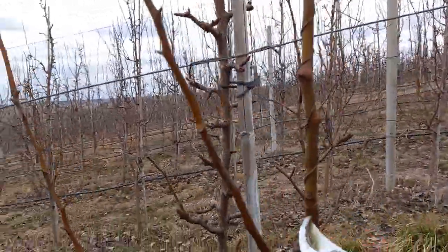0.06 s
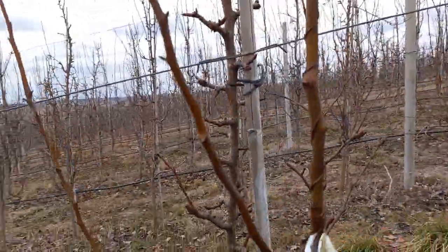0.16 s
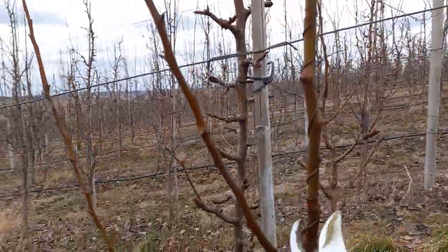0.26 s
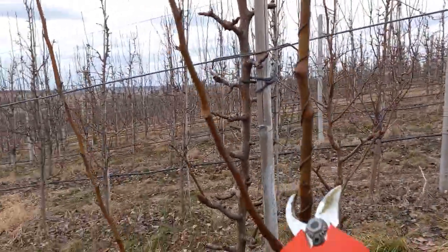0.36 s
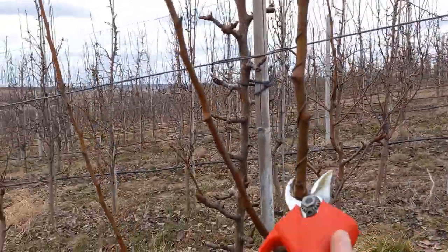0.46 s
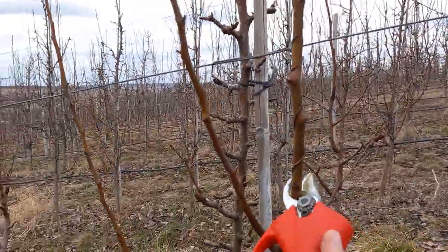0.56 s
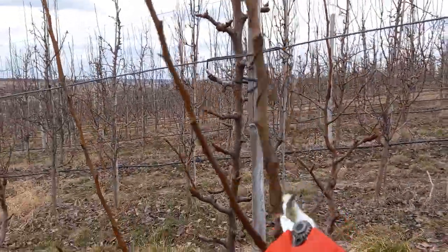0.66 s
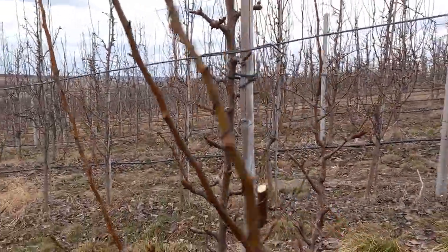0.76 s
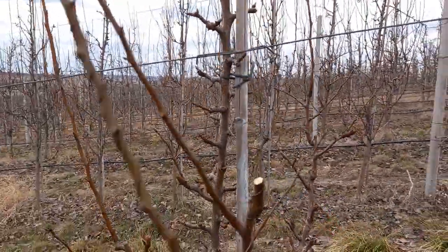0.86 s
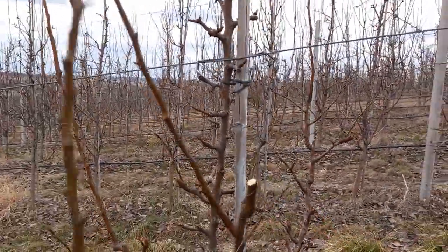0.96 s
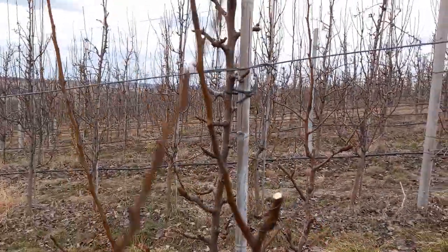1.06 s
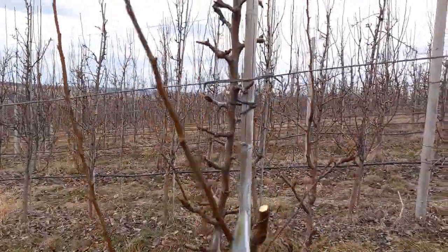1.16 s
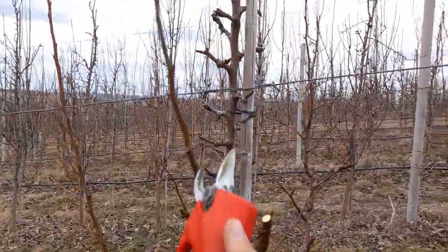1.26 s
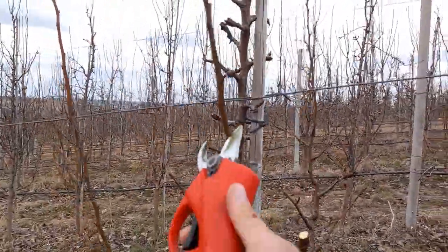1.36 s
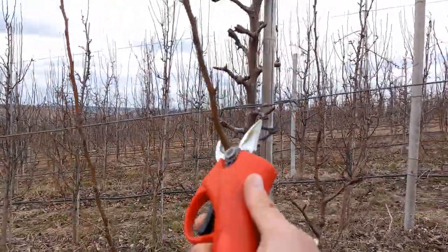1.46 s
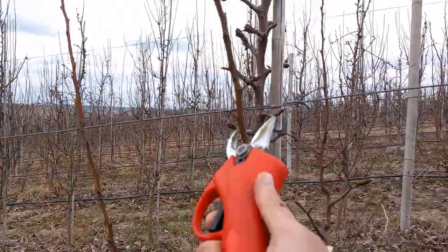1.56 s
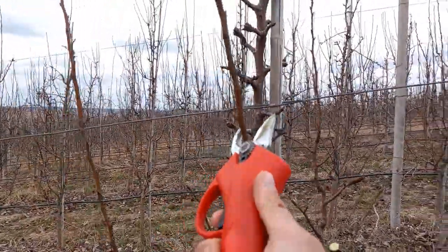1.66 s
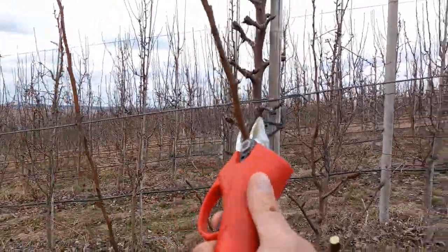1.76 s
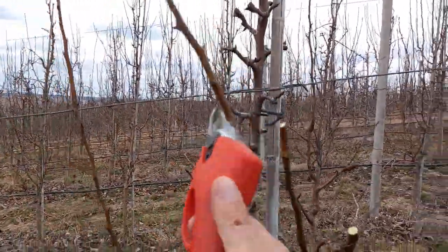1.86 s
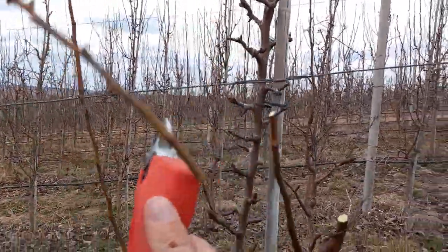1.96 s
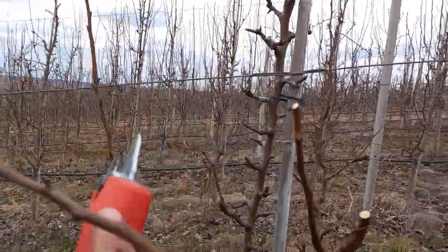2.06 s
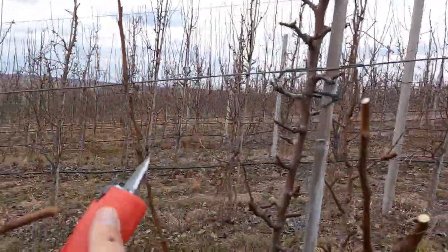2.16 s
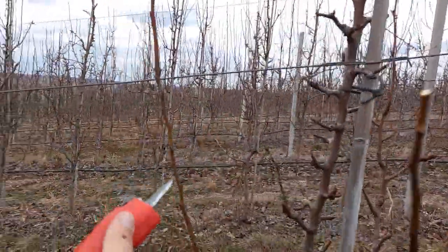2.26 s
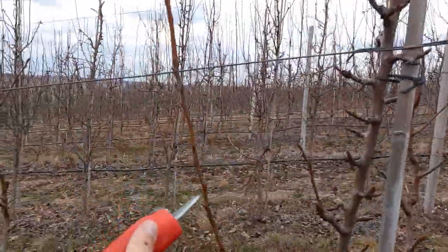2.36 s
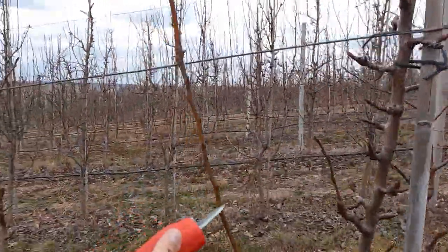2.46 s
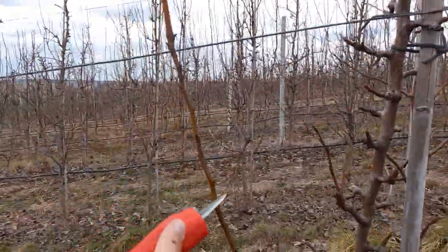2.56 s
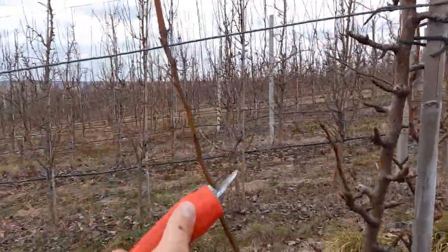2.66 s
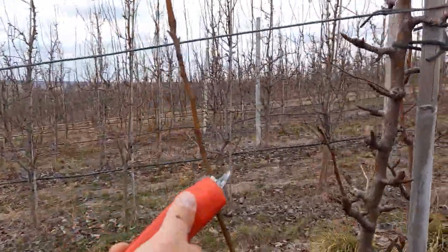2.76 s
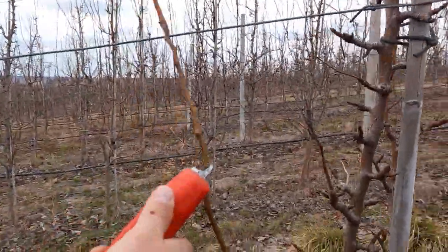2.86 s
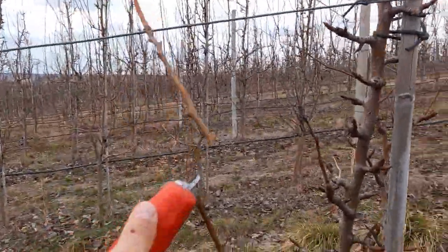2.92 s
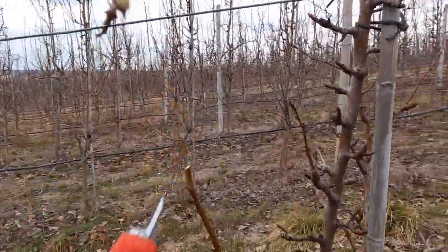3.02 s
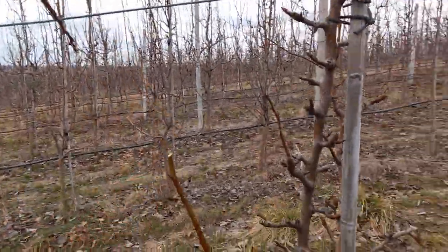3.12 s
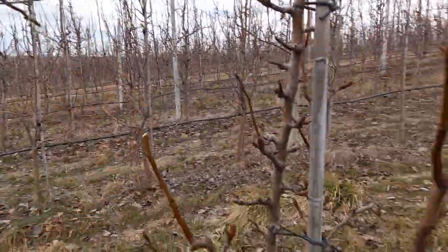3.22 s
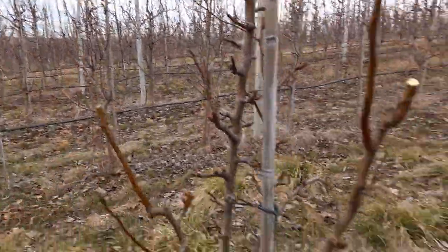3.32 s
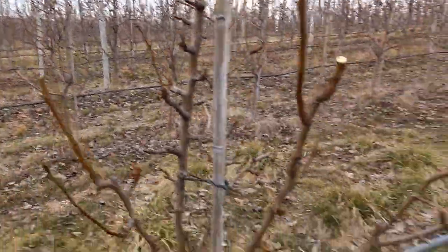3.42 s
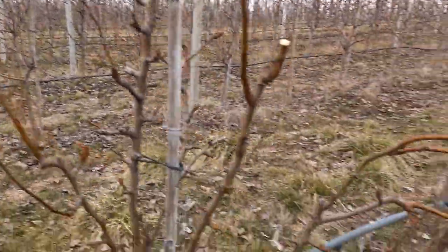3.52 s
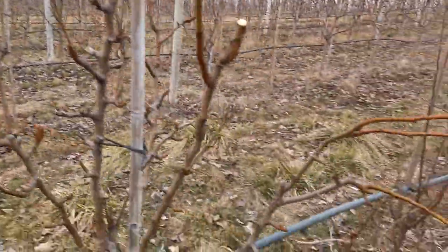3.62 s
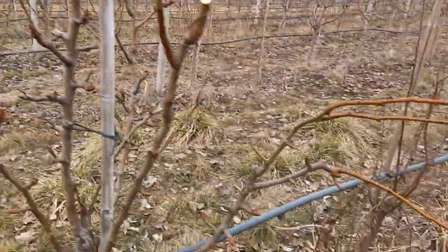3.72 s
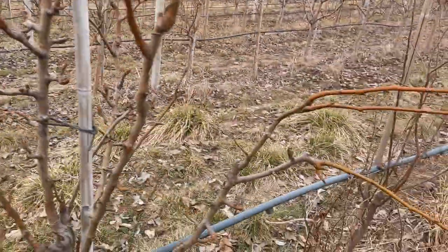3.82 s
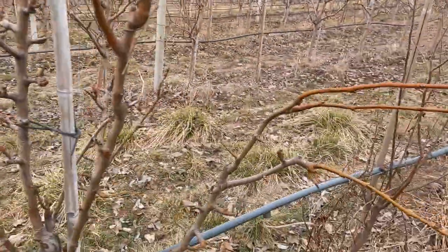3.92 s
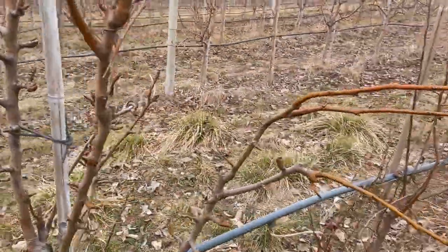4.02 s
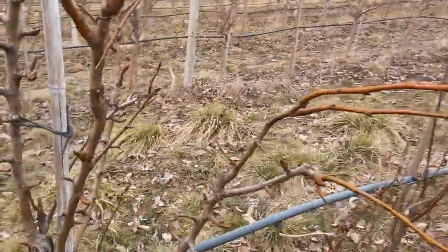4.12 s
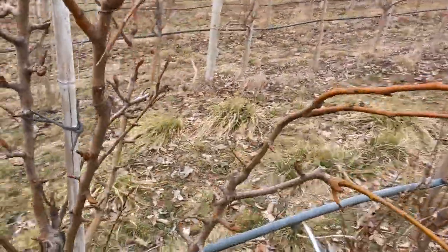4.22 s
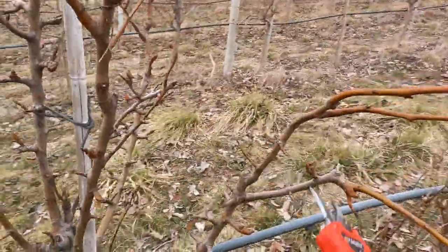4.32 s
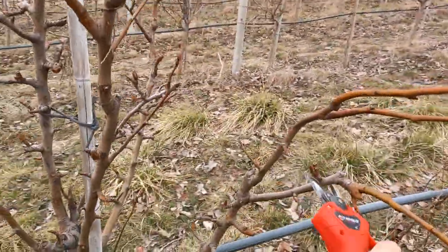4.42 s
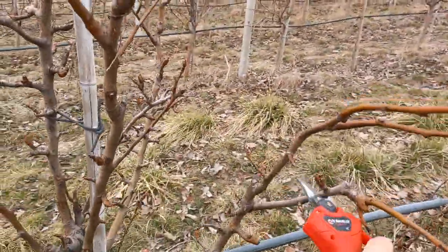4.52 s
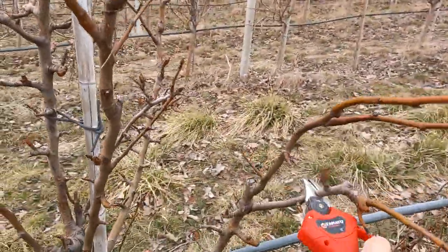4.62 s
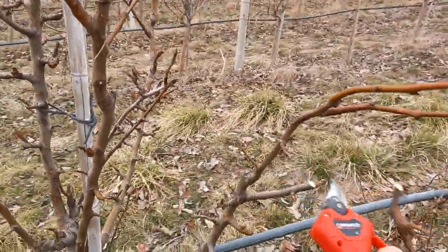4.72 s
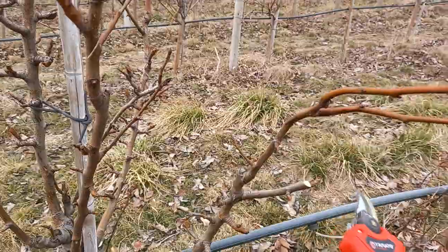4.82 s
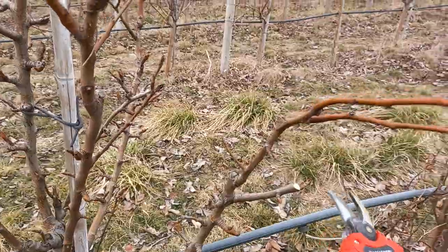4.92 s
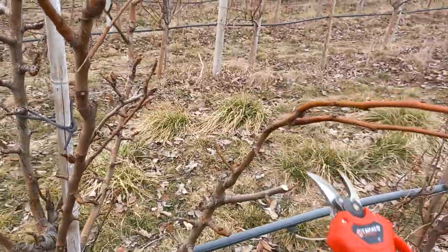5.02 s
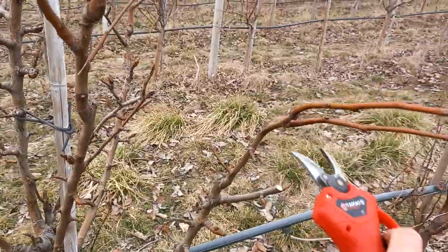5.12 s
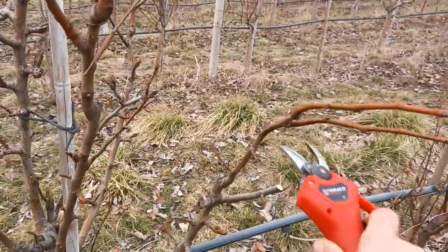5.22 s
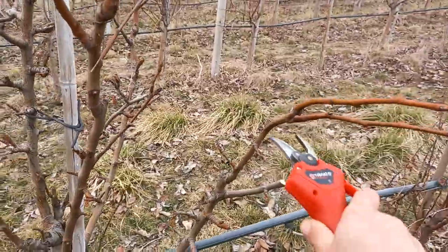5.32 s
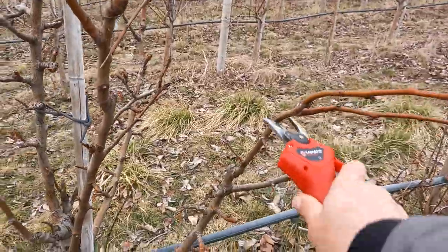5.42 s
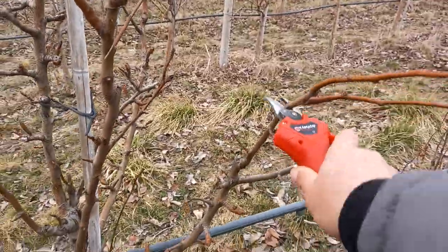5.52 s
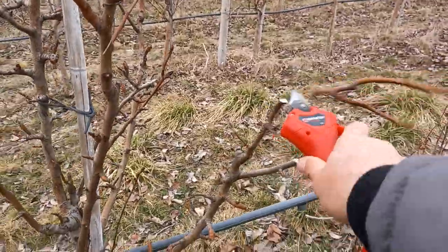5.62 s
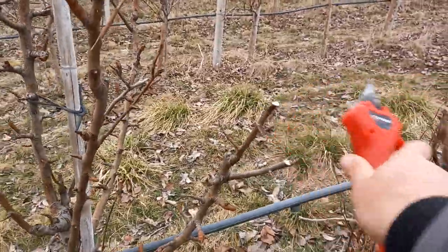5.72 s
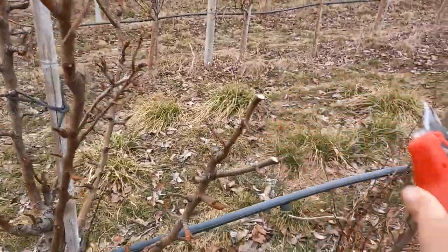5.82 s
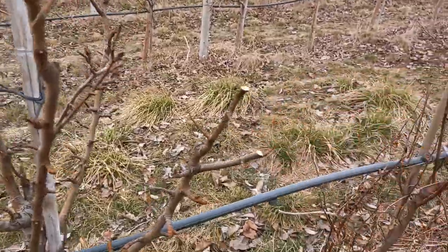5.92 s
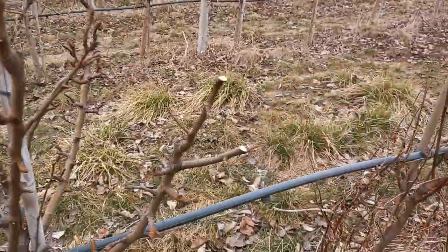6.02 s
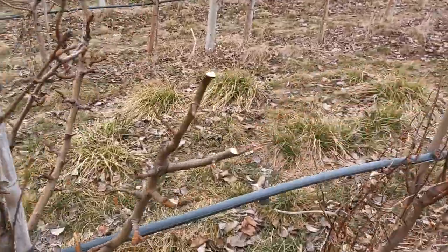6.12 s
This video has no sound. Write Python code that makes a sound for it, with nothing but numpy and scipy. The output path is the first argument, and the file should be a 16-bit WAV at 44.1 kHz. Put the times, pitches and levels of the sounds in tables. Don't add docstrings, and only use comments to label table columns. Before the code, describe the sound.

Close outdoor recording of powered pruning shears in a bare orchard. Each quarter-second stroke begins with a tiny high chirp, then a rattling geared motor whirrs up and slows to a blade knock. Some strokes crush wood and end in a sharp snap. Twigs tick and sleeves rustle between cuts, while wind rumbles low on the stereo microphone, strongest at the start and midway.

```python
import sys
import numpy as np
from scipy import signal
from scipy.io import wavfile
from scipy.ndimage import uniform_filter1d, map_coordinates

SR = 44100
rng = np.random.default_rng(int(sys.argv[2]) if len(sys.argv) > 2 else 0)


def elevation(decibels):
    levels = np.asarray(decibels, float)
    return 10 ** (levels / 20)


def wav_record(signal):
    frames = np.transpose(np.atleast_2d(signal))
    bounded = np.clip(frames, -1, 1)
    quanta = np.round(bounded * 32767).astype(np.int16)
    wavfile.write(sys.argv[1], SR, quanta)


N = 272538


def evened(x):
    return x / np.sqrt(np.mean(x ** 2) + 1e-20)


def add(mix, start_s, sound):
    part = mix[round(start_s * SR):][:len(sound)]
    part += sound[:len(part)]


def colour(x, points):
    hz, db = np.transpose(points)
    bin_hz = abs(np.fft.fftfreq(8192, 1 / SR))
    log_gain = np.interp(np.log(bin_hz + 1), np.log(hz), db) * np.log(10) / 20
    minimum_phase = np.exp(np.conj(signal.hilbert(log_gain)))
    taps = np.fft.ifft(minimum_phase).real[:4096]
    return signal.oaconvolve(x, taps)[:len(x)]


def ring(x, pitch_hz, width_hz):
    return signal.lfilter(*signal.iirpeak(pitch_hz, pitch_hz / width_hz, SR), x)


def wobble(count, size):
    smooth = uniform_filter1d(rng.standard_normal(count), size=size)
    return evened(uniform_filter1d(smooth, size=size))


def grains(per_s, spread_db, hiss):
    size_db = spread_db * np.minimum(rng.exponential(1, N), 3)
    size = elevation(size_db) * rng.standard_normal(N)
    clicks = evened(size * (rng.random(N) < per_s / SR))
    return evened(clicks + hiss * rng.standard_normal(N))


def swell(peak_s, level_db, rise_s, hold_s, fall_s):
    t = np.arange(0, N + 32, 32) / SR - peak_s
    before = -t / max(rise_s, .002)
    after = (t - hold_s) / max(fall_s, .002)
    return elevation(level_db - 30 * np.maximum(np.maximum(before, after), 0))


def layers(swells, shares_db, floors_db):
    power = np.array(swells) ** 2
    first = elevation(2 * floors_db[0]) + power.sum(axis=0)
    second = elevation(2 * floors_db[1]) + elevation(2 * np.array(shares_db)) @ power
    return [np.interp(np.arange(N), 32 * np.arange(len(p)), np.sqrt(p)) for p in (first, second)]


# (arrives_s, hold_s, rumble_db, flutter_share_db, fall_s)
LOW_SWELLS = [(0.033, .23, -33, -14, 0.2), (0.38, 0.37, -46.5, 1, 0.11), (0.864, 0.0073, -61, 5.5, 0.096),
              (1.188, .01, -67.5, -6, 0.1), (1.775, .01, -58, 14.5, 0.23), (2.028, 0.006, -91.5, 45.5, 0.3),
              (2.212, 0.013, -77, 20, 0.25), (2.54, .01, -88, 21.5, .1), (2.8, .01, -81, 30, 0.1),
              (3.059, 0.025, -48.5, 2.5, 0.089), (3.217, 0.0052, -50, 4.5, 0.25), (3.45, 0.28, -34, -14, 0.28),
              (3.871, 0.006, -36, -10, 0.25), (3.936, 0.36, -40, -22, 0.38), (4.665, 0.0086, -55.5, 9, 0.1),
              (4.926, 0.069, -64, 9.5, 0.15), (5.84, 0.15, -76, 10, .3), (6.17, .01, -59, -15, .1)]
# (pitch_hz, level_db)
RUMBLE_COLOUR = [(20, -28), (45, -17.5), (85, 2), (120, -10.5), (180, -17.5), (300, -16.5), (600, -58.5)]
# (pitch_hz, level_db)
FLUTTER_COLOUR = [(100, -30), (200, -37.5), (270, -6.5), (360, 3.5), (500, -4.5), (800, -20), (1500, -43.5)]


def wind():
    swells = [swell(s, db, .14, hold, fall) for s, hold, db, _, fall in LOW_SWELLS]
    calm_db = (-84, -85)
    rumble_gain, flutter_gain = layers(swells, [row[3] for row in LOW_SWELLS], calm_db)
    ports = []
    for side_db in (.5, -.5):
        rumble, flutter = (evened(colour(rng.standard_normal(N), points) * elevation(6.4 * wobble(N, size=800)))
                           for points in (RUMBLE_COLOUR, FLUTTER_COLOUR))
        ports.append(elevation(2.5) * (rumble_gain * rumble + elevation(side_db) * flutter_gain * flutter))
    return np.array(ports)


# (start_s, chirp_peak_db, rattle_db, low_housing_share_db, hiss_share_db)
STROKES = [(0.0922, -27.5, -32.5, -8.5, -5.5), (0.423, -21, -36.5, -11.5, -2.5),
           (0.736, -19.5, -33, -5.5, -6), (1.6218, -20.5, -33.5, -10.5, -7), (1.878, -12, -29.5, -4, -6.5),
           (2.594, -20.5, -34.5, -4.5, -6), (2.9013, -18, -35, 2, -1), (4.4635, -23.5, -36.5, -2, -2.5),
           (4.7655, -18.5, -33.5, -4.5, -2.5), (5.439, -17, -38.5, -3, 1), (5.7397, -16, -32.5, -3, -1.5)]
# (pitch_hz, level_db)
CHIRP_TONES = [(4490, -1), (5340, 0), (6260, 0), (7000, -5), (3600, -15)]
# (multiple_of_tooth_rate, level_db, wavering_db, gain_under_load_db)
GEAR_TONES = [(.25, -19, 3, 0), (1, -2, 3.5, -6), (2, -4, 4, 0), (2.6, -3, 2.5, 24), (4, 7, 2.5, 0)]
# (tooth_tone_db, top_tone_extra_db, share_of_speed_lost_under_full_load)
STROKE_TONES = [(-42, -3, 0), (-41, -8, .1), (-40, -4, 0), (-40, 3, .02), (-38, -2, 0), (-39, 11, 0),
                (-38, -9, 0), (-44, -7, .04), (-44, -5, 0), (-44, -7, .04), (-44, -5, 0)]
# (pitch_hz, level_db)
SHELL = [(250, -20), (360, 0), (600, -22), (950, -9), (1250, 0), (2300, 1), (2800, -3), (3200, 0),
         (3800, 0), (4600, -18), (5300, -9), (5750, 0)]
START_HZ, TOP_HZ, END_HZ = 500, 1450, 800
SPIN_UP_S, BRAKE_S, STROKE_S = .105, .157, .25


def whine(load):
    chirps, tones = np.zeros(N), np.zeros(N)
    t = np.arange(0, STROKE_S, 1 / SR)
    speed = np.interp(t, [0, SPIN_UP_S, BRAKE_S, STROKE_S], [START_HZ, TOP_HZ, TOP_HZ, END_HZ])
    speed = uniform_filter1d(speed, size=1300)
    slowness = (TOP_HZ - speed) / (TOP_HZ - START_HZ)
    fade = elevation(-44 * slowness ** 2) * np.clip((STROKE_S - t) / 0.018, 0, 1)
    chirp_t = np.arange(0, .012, 1 / SR)
    gate = np.clip(chirp_t / .0004, 0, 1) * elevation(-np.maximum(chirp_t - .0038, 0) * 11000)
    for (start, chirp_db, *_), (tone_db, top_db, sag) in zip(STROKES, STROKE_TONES):
        chirp = sum(elevation(db + 3 * rng.standard_normal()) * np.sin(2 * np.pi * (hz * chirp_t + rng.random()))
                    for hz, db in CHIRP_TONES)
        add(chirps, start, elevation(chirp_db - 9) * gate * chirp)
        strain = uniform_filter1d(load[round(start * SR):][:len(t)], size=400)
        turns = np.cumsum(speed * (1 - sag * strain)) / SR
        stroke = np.zeros(len(t))
        for multiple, db, waver_db, load_db in GEAR_TONES:
            is_top = multiple > 3
            gain_db = db + is_top * top_db + load_db * strain + waver_db * wobble(len(t), size=150)
            tone = np.sin(2 * np.pi * (multiple * turns + rng.random()))
            stroke += elevation(gain_db) * fade ** is_top * tone
        add(tones, start, elevation(tone_db) * fade * stroke)
    return chirps + colour(tones, SHELL)


# (pitch_hz, width_hz, level_db)
HOUSING_RINGS = [
    [(756, 530, -16.5), (1280, 490, 1), (2322, 1420, 12.5), (2440, 360, -34), (3780, 425, 19.5)],
    [(4170, 230, -8.5), (5480, 450, 1.5), (6050, 700, 7.5), (6920, 600, 0.5)],
]
# (pitch_hz, level_db)
HISS_COLOUR = [(4000, -44), (7000, -6), (9000, -4), (11000, -1.5), (12500, -5.5), (14000, -10.5),
               (16000, -16)]


def housing(drive):
    groups = [sum(elevation(db) * ring(ring(drive, hz, width), hz, 2 * width) for hz, width, db in group)
              for group in HOUSING_RINGS]
    return [evened(group) for group in groups + [colour(drive, HISS_COLOUR)]]


# (after_start_s, level_db)
RATTLE_RUN = [
    (.002, -10.5),
    (.028, -8),
    (.034, -1.5),
    (.11, 3),
    (.2, -3),
    (.233, -2.5),
    (.246, -22.5),
    (.26, -31),
    (.31, -37.5),
]


def gears():
    teeth = grains(per_s=8600, spread_db=9.5, hiss=1.54) * elevation(1.96 * wobble(N, size=90))
    groups = housing(teeth)
    out = np.zeros(N)
    t = np.arange(0, RATTLE_RUN[-1][0], 1 / SR)
    run_db = np.interp(t, *np.transpose(RATTLE_RUN))
    for start, _, rattle_db, low_db, hiss_db in STROKES:
        low, main, hiss = (group[round(start * SR):][:len(t)] for group in groups)
        add(out, start, elevation(rattle_db + run_db) * (elevation(low_db) * low + main + elevation(hiss_db) * hiss))
    return out


# (start_s, peak_db, pitch_hz)
END_STOPS = [(0.3341, -18, 4710), (0.6757, -21, 6450), (0.9757, -23, 2020), (1.8634, -25, 4620),
             (2.1206, -9, 2150), (2.825, -15, 4840), (3.1398, -11, 1840), (4.6987, -18, 4630),
             (5.005, -14, 4960), (5.675, -21, 5050), (5.978, -8, 6000)]
# (start_s, peak_db, pitch_hz)
WOOD_SNAPS = [
    (0.6284, -2, 3800),
    (1.8124, -4, 6260),
    (1.8334, -10, 6320),
    (1.923, -16, 2360),
    (1.9972, -12, 6080),
    (2.7745, -4, 2600),
    (2.8, -14, 4000),
    (4.6715, -13, 5400),
    (5.6495, -13, 4940),
]
# (start_s, peak_db, pitch_hz)
TWIG_TICKS = [(0.3584, -24, 4830), (0.4337, -18, 5860), (1.1443, -22, 1755), (1.1608, -8, 4160),
              (1.3756, -16, 4170), (1.4074, -23.5, 1800), (1.4389, -28, 1640), (1.456, -30, 6060),
              (1.4736, -31.5, 4430), (1.5446, -32.5, 1490), (1.572, -30.5, 6150), (2.162, -31.5, 2400),
              (2.5062, -57.5, 4320), (2.5177, -24.5, 5840), (3.2024, -36, 1130), (3.3393, -21, 5900),
              (3.4715, -19, 6050), (3.5992, -28, 4800), (3.7054, -18.5, 6200), (3.7825, -25, 4440),
              (3.848, -21.5, 5860), (3.9135, -19.5, 6300), (4.0202, -27, 5200), (4.0331, -20.5, 5000),
              (5.0179, -31, 5900), (5.113, -29, 3600), (5.1295, -21.5, 3870), (6.0066, -12.5, 5800),
              (6.0231, -24, 6000), (6.041, -30.5, 5800)]


def knocks():
    out, t = np.zeros(N), np.arange(0, .08, 1 / SR)
    for rows, ring_s in ((END_STOPS, .03), (WOOD_SNAPS, .022), (TWIG_TICKS, .02)):
        fall = elevation(-60 * t / .006) + .4 * elevation(-60 * t / ring_s)
        for start, peak_db, hz in rows:
            step = 2.5 * elevation(-60 * t / .0012)
            burst = (rng.standard_normal(len(t)) + step) * fall * np.clip(t / .0003, 0, 1)
            crack = signal.lfilter([1, -hz / 7500], [1], burst)
            sound = crack + 2.2 * ring(burst, hz, 900)
            add(out, start, elevation(peak_db) * sound / abs(sound).max())
    return colour(out, [(80, -60), (400, -18), (1000, -2), (6000, 0), (9000, -1), (16000, -8)])


# (loudest_s, level_db, rise_s, fall_s, low_share_db)
BRUSHES = [(0.349, -52.5, 0.033, 0.17, 3), (1.0, -64, 0.0094, 0.18, -14), (1.149, -32.5, 0.014, 0.032, -4),
           (1.371, -35.5, 0.0043, 0.12, -6.5), (1.544, -57, 0.007, 0.98, 0.5),
           (2.2, -63.5, 0.14, 0.39, -11), (2.311, -47, 0.015, 0.33, -7), (2.39, -47, 0.18, 0.18, -3.5),
           (2.511, -24, 0.015, 0.063, -3), (2.887, -46.5, 0.33, 0.037, 1.5), (3.439, -41, 0.17, 0.2, -5.5),
           (3.25, -55, 0.18, 1, 0), (3.707, -37.5, 0.006, 0.097, -1), (3.855, -38.5, 0.048, 0.1, -2.5),
           (3.928, -40.5, 0.017, 0.26, -4.5), (4.15, -57, 1.0, 1.0, -28.5), (4.454, -50, 0.39, 0.048, 0),
           (5.014, -28.5, 0.022, 0.05, -1.5), (5.119, -46.5, 0.13, 0.088, -3),
           (5.212, -63.5, 0.11, 0.56, -20), (6.022, -29.5, 0.0067, 0.1, -1), (6.174, -43, 0.11, .1, -4)]
# (pitch_hz, level_db)
BRUSH_COLOUR = [(500, -25), (1200, -10), (2500, -8.5), (4000, 2), (6000, 12), (8000, 5), (11000, 2.5),
                (16000, -2.5)]


def rustle():
    clumps = elevation(2.2 * evened(uniform_filter1d(rng.standard_normal(N), size=300)))
    fine = grains(per_s=3000, spread_db=3.5, hiss=1.2)
    coarse = grains(per_s=160, spread_db=3.5, hiss=0)
    scratch = colour((fine + .6 * coarse) * clumps, BRUSH_COLOUR)
    low = signal.sosfilt(signal.butter(2, 3600, fs=SR, output="sos"), scratch)
    swells = [swell(s, db, rise, 0, fall) for s, db, rise, fall, _ in BRUSHES]
    still_db = (-67.5, -70.5)
    high_gain, low_gain = layers(swells, [row[-1] for row in BRUSHES], still_db)
    return elevation(3.5) * (high_gain * evened(scratch - low) + low_gain * evened(low))


# (blade_bites_s, wood_parts_s, crush_db, after_parting_db, low_share_db)
WOOD_CUTS = [
    (0.496, 0.62, -17.5, -31, -6),
    (1.705, 1.806, -20, -31, -3.5),
    (2.684, 2.765, -23, -33.5, -2),
    (4.559, 4.645, -21.5, -35.5, -1.5),
    (5.516, 5.628, -23, -35, 1),
]
FREE_DB, LOADED_DB = -34, -24


def crush():
    level_db, low_db, t = np.full(N, -100.), np.zeros(N), np.arange(N) / SR
    for bite, part, crush_db, after_db, share_db in WOOD_CUTS:
        stop = min(s for s, *_ in END_STOPS if s > part) + 0.0043
        inside = (t > bite) & (t < stop)
        now = t[inside]
        done = np.clip((now - bite) / (part - bite), 0, 1)
        parted = np.clip((now - part) / .027, 0, 1)
        level_db[inside] = crush_db - 19.5 * (1 - done) ** 1.475 + (after_db - crush_db) * parted
        low_db[inside] = share_db + 13 * ((now - bite) / (stop - bite) - .5)
    level_db = uniform_filter1d(level_db, size=200)
    fibres = grains(per_s=4000, spread_db=3.0, hiss=1.0) * elevation(1.6 * wobble(N, size=120))
    low, main, hiss = housing(fibres)
    sound = elevation(level_db) * (elevation(low_db) * low + main + elevation(-7) * hiss)
    load = np.clip((level_db - FREE_DB) / (LOADED_DB - FREE_DB), 0, 1)
    return sound, load


# (time_s, left_lags_right_samples, left_over_right_db)
HAND_PATH = [(.2, -7, 0), (.55, -8, -.5), (.86, -4, -.5), (1.15, -3, 0), (1.39, 3, 0), (1.75, -5, -1),
             (2.0, -1, -2.5), (2.35, 3, -2), (2.72, 3, -.5), (3.03, 7, -.5), (3.44, 1, .5), (3.93, 0, .5),
             (4.6, -8, -1), (4.9, -10, -1), (5.12, -4, 0), (5.57, -7, -.5), (6.03, -7, 0)]
# (pitch_hz, level_db)
LEFT_SHADOW = [(700, 1), (2400, 0), (4400, -1.5), (8000, -3.5), (15000, -2.5)]


def place(x, scatter_db):
    n = np.arange(N)
    move_s, lag, side_db = np.transpose(HAND_PATH)
    late = n - np.interp(n / SR, move_s, lag)
    left = map_coordinates(x, [late], order=3) * elevation(np.interp(n / SR, move_s, side_db))
    hz, _, spectrum = signal.stft(np.r_[np.zeros(90), x][:N], SR, nperseg=128)
    phase = 2 * np.pi * rng.random((spectrum.shape[1], len(hz), 2)).T
    spectrum = spectrum * np.exp(1j * phase) * np.sqrt(hz / 8000)[:, None]
    scatter = signal.istft(spectrum, SR, nperseg=128)[1][:, :N]
    left, right = np.array([left, x]) + elevation(scatter_db) * scatter
    return np.array([colour(left, LEFT_SHADOW), right])


def scene():
    wood, load = crush()
    noisy = place(gears() + wood + rustle(), scatter_db=1)
    clear = place(whine(load) + knocks(), scatter_db=-9)
    return wind() + noisy + clear


def top_cut(x):
    return signal.sosfilt(signal.butter(12, 16960, fs=SR, output="sos"), x)


# (pitch_hz, level_db)
PORT_COLOUR = [(300, 0), (5000, 0), (6700, 0), (7000, -4), (7200, -15), (7500, -21), (7900, -11),
               (9000, -3), (11000, 0), (15650, 0), (15950, -30), (17000, -34)]


def record(dry):
    mix = np.array([colour(channel, PORT_COLOUR) for channel in dry])
    return top_cut(mix)


dry = scene()
out = record(dry)
wav_record(out)
```